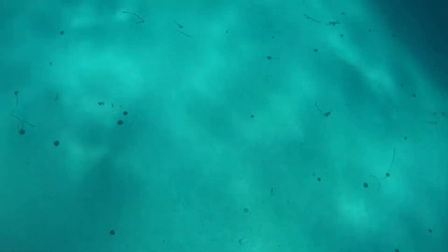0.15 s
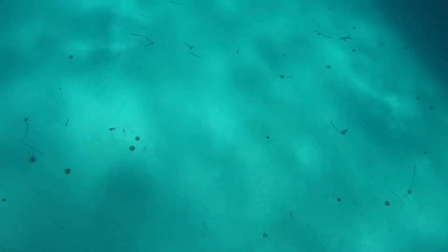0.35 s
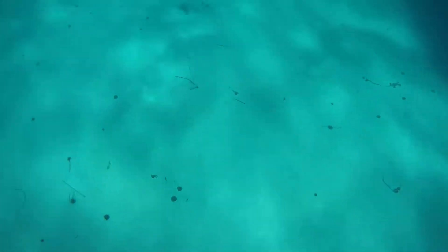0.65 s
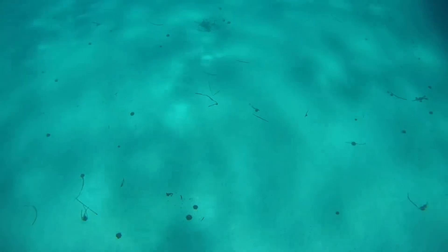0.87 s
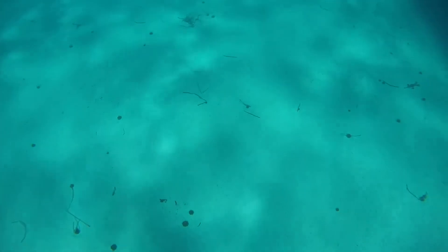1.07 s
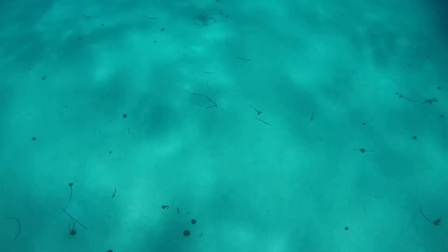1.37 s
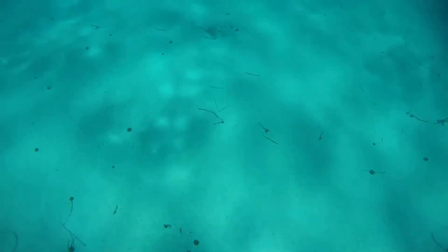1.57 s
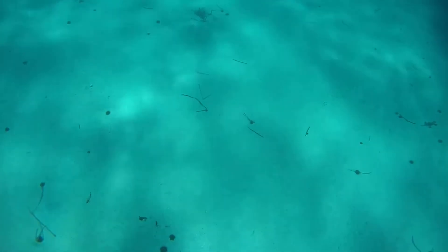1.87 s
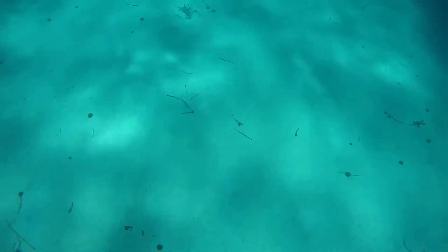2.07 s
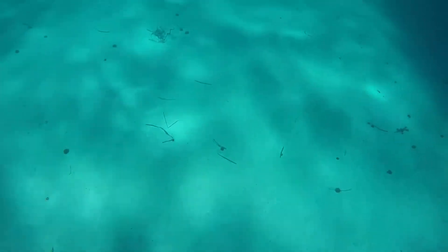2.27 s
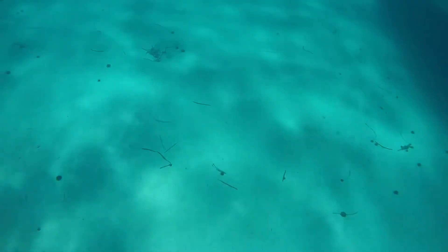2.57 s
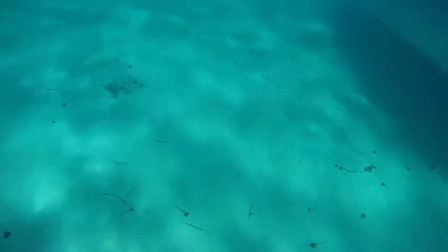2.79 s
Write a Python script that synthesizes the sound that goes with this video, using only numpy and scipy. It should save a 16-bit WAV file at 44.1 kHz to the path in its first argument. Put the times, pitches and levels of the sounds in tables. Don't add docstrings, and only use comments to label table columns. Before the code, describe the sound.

Water gurgling and glugging underwater around a submerged camera case, with dull bumps and low rumble

```python
import sys
import numpy as np
from scipy import signal
from scipy.fft import rfft, irfft
from scipy.io import wavfile
from scipy.ndimage import uniform_filter1d

SR = 44100
rng = np.random.default_rng(int(sys.argv[2]) if len(sys.argv) > 2 else 0)


def to_linear_factor(level_db):
    exponent = np.asarray(level_db, float) / 20
    return 10 ** exponent


def transcribe(signal):
    frames = np.atleast_2d(signal).T
    limited = np.clip(frames, -1, 1)
    pcm = np.round(limited * 32767).astype(np.int16)
    wavfile.write(sys.argv[1], SR, pcm)


N = 129213

# frequency in Hz, width in Hz, level in dB.
HOUSING = [(135, 57, -10.5), (304, 49, -7.5), (442, 82, -3), (537, 76, -3.5), (786, 96, -6),
           (1333, 132, -10), (1620, 340, -16), (1950, 260, -16)]
# frequency in Hz, width in Hz, level in dB.
CIRCUIT = [(8540, 450, -6.5), (9760, 640, -5.5), (12160, 780, -4), (14600, 580, -8)]
DIP_HZ, DIP_WIDTH_HZ = 1125, 290
FRAMES_PER_S, FIRST_TICK_S = 59.94, .0154


def rms_one(x):
    return x / np.sqrt(np.mean(x ** 2) + 1e-20)


def drift(rate):
    hop = 40
    r = np.exp(-2 * hop * np.pi * rate / SR)
    noise = rng.standard_normal(N // hop + 2002)
    slow = signal.lfilter([1], [1, -2 * r, r * r], noise)[2000:]
    return np.interp(np.arange(N) / hop, np.arange(len(slow)), rms_one(slow))


def lowpass(x, order, hz):
    return signal.sosfilt(signal.butter(order, hz, fs=SR, output="sos"), x)


def resonances(x, peaks):
    out = 0
    for k, (hz, width, db) in enumerate(peaks):
        r = np.exp(-np.pi * abs(width) / SR)
        poles = [2, -4 * r * np.cos(2 * np.pi * hz / SR), 2 * r * r]
        out = out + (-1) ** k * to_linear_factor(db) * signal.lfilter([1 - r * r, 0, r * r - 1], poles, x)
    return out


def hiss():
    b, a = signal.butter(1, 1460, "high", fs=SR)
    return to_linear_factor(-58.5) * signal.lfilter(b, a, rng.standard_normal(N))


def frame_ticks():
    clicks = np.full(N + 99, 1e-18)
    at = (np.arange(FIRST_TICK_S, N / SR, 1 / FRAMES_PER_S) * SR).astype(int)
    clicks[at] = to_linear_factor(2 * rng.standard_normal(len(at)))
    ticks = resonances(clicks[:N], CIRCUIT)
    peaks = np.abs(ticks[at[:-1, None] + np.arange(30)]).max(axis=1)
    return to_linear_factor(-48.5) * ticks / np.median(peaks)


def frame_whine():
    t = np.arange(N) / SR
    phase = (t - FIRST_TICK_S) * FRAMES_PER_S % 1
    gate = (phase > .5) + 0.082
    return to_linear_factor(-70) * uniform_filter1d(gate, size=40) * np.sin(2 * np.pi * 7852.2 * t)


def memory_writes():
    starts = [.33, .385, .51, .55, .62, .67, .72, .935, 1.1, 1.33, 1.44, 1.612, 1.79, 1.94, 2.12, 2.29,
              2.46, 2.64, 2.83]
    write_s = .052
    t = np.arange(N) / SR
    on = sum((t > s) & (t < s + write_s) for s in starts) * 1.
    busy = uniform_filter1d(on, size=400)
    return to_linear_factor(-64 + drift(30)) * busy * rms_one(resonances(rng.standard_normal(N), CIRCUIT))


def whistles():
    # frequency in Hz, level in dB rms.
    tones = [(9722, -66.5), (9862, -77), (11343, -68), (11483, -81)]
    end_s, blur_hz = 0.286, 80
    t, out = np.arange(N) / SR, 0
    for hz, db in tones:
        turns = np.cumsum(hz + blur_hz * drift(60)) / SR
        out = out + to_linear_factor(db + 4) * np.sin(2 * np.pi * turns)
    return out * np.clip((end_s - t) / .03, 0, 1)


def banded_noise(points, patchy_db):
    out, together = 0, drift(4)
    edges = 18 * 2 ** np.arange(0, 10, .5)
    white, table = rng.standard_normal((2, N + SR)), np.array(points)
    for k, (low, high) in enumerate(zip(edges, edges[1:])):
        sos = signal.butter(2, [low, high], "band", fs=SR, output="sos")
        band = signal.sosfilt(sos, white[k % 2])[SR:]
        hz = np.sqrt(low * high)
        level = np.interp(np.log(hz), np.log(table[:, 0]), table[:, 1])
        off = 30 * max(np.log2(table[0, 0] / hz), np.log2(hz / table[-1, 0]), 0)
        out = out + band * to_linear_factor(level - off + patchy_db * (0.21 * together + drift(22)))
    return rms_one(out)


def gurgle(vigour_db):
    per_s, spread_db, cycles = 250, 3.5, 13
    sizes = to_linear_factor(spread_db * np.minimum(rng.exponential(1, N), 3)) * rng.choice([-1, 1], N)
    born = rng.random(N) < per_s * to_linear_factor(vigour_db + 3 * drift(6)) / SR
    dealt, out = rng.integers(0, 24, N), 0
    for k, hz in enumerate(np.geomspace(110, 2300, 24)):
        r, w = to_linear_factor(-60 * hz / cycles / SR), 2 * np.pi * hz / SR
        impulses = sizes * born * (dealt == k) + 1e-18
        ring = signal.lfilter([0, np.sin(w)], [1, -2 * r * np.cos(w), r * r], impulses)
        out = out + np.sqrt(hz) * ring
    return out


def water():
    # time in seconds, rumble in dB, fizz in dB.
    flow = [(0, -30.5, -49), (.2, -34.5, -46), (.32, -35, -52), (.52, -39.5, -48), (.66, -39, -45),
            (.765, -37, -41), (.79, -36, -51), (.88, -35.5, -48), (1.1, -38, -47.5), (1.33, -40, -51),
            (1.6, -36, -54.5), (1.821, -42, -48.5), (1.86, -42.5, -56), (1.99, -41.5, -50),
            (2.1, -43.5, -54.5), (2.55, -38, -55), (2.93, -42, -56.5)]
    # frequency in Hz, level in dB per Hz.
    rumble_colour = [(20, -2), (60, 4.5), (250, 0), (500, -1.5), (850, -19), (1100, -29.5), (2500, -27.5),
                     (5000, -35.5)]
    rumble_db, rumble_follows = -3, 0.32
    s, db, fizz_db = np.transpose(flow)
    level, fizz = (np.interp(np.arange(N) / SR, s, c) for c in (db, fizz_db))
    swing = level - level.mean()
    rumble = banded_noise(rumble_colour, patchy_db=1.0)
    rumble = to_linear_factor(level.mean() + rumble_db + rumble_follows * swing) * rumble
    slosh = rng.standard_normal(N) * to_linear_factor(2 * drift(20))
    far = gurgle(swing)

    def through_housing(part):
        near_sound = to_linear_factor(-3.5) * rms_one(resonances(slosh, part))
        return near_sound + to_linear_factor(-9) * rms_one(resonances(far, part))

    low = lowpass(through_housing(HOUSING[:5]), 3, 950)
    high_pass = signal.butter(3, 1150, "high", fs=SR, output="sos")
    high = signal.sosfilt(high_pass, through_housing(HOUSING[5:]))
    return rumble + to_linear_factor(level) * low + to_linear_factor(fizz - 1) * high


def grit():
    # start in seconds, peak in dB, time to decay by 60 dB in seconds.
    puffs = [
        (0.1, -41, 0.031),
        (0.13, -46, 0.046),
        (.14, -65, 0.21),
        (.1965, -48, .02),
        (0.854, -55, 0.047),
        (0.875, -52, 0.055),
        (2.233, -50, .015),
        (2.811, -50, 0.023),
        (1.962, -46.5, 0.0076),
        (1.996, -50, 0.037),
    ]
    t, out = np.arange(N) / SR, 0
    for s, db, t60 in puffs:
        out = out + (t > s) * to_linear_factor(db - 60 * np.maximum(t - s, 0) / t60)
    grains = rng.standard_normal(N) * to_linear_factor(2.2 * drift(120))
    return out * rms_one(resonances(grains, [(2240, 1000, 0), (3600, 600, -4), (7000, 2500, -12)]))


def slaps():
    # time in seconds, peak in dB.
    hits = [(0.035, -30.5), (0.065, -42.5), (0.092, -38), (0.1624, -28), (.4219, -39.5), (.6444, -35),
            (0.729, -29), (.75, -33), (0.79, -33), (0.854, -38), (0.919, -35), (1.1308, -28), (1.351, -35),
            (1.526, -56), (1.601, -38), (1.7067, -31), (1.9595, -30.5), (1.987, -27), (2.183, -40),
            (2.2343, -42), (2.304, -31), (2.366, -32), (2.415, -52), (2.467, -43), (2.81, -35.5)]
    soft_hz, bright_db, widen = 2300, -4.5, 8.2
    s, db = np.transpose(hits)
    chance, out = rng.standard_normal((len(s), len(HOUSING))), 0
    for k, (hz, width, peak_db) in enumerate(HOUSING):
        clicks = np.full(N, 1e-18)
        strength_db = db + 1.8 * chance[:, k] + bright_db * (hz > DIP_HZ)
        clicks[(s * SR).astype(int)] = to_linear_factor(strength_db) * SR / (7 * width)
        ring = resonances(clicks, [(hz, width, peak_db)])
        out = out + (-1) ** k * resonances(ring, [(hz, widen * width, 0)])
    return lowpass(out, 4, soft_hz)


def surges():
    # middle in seconds, peak in dB, pitch in Hz, half length in seconds.
    bumps = [(.365, -24.5, 264, 0.0027), (.405, -23.5, 308, 0.0047), (.435, -17, 335, 0.0018),
             (.467, -21.5, 237, 0.004), (.474, -23.5, 139, 0.0081), (.575, -30, 280, 0.0088),
             (.805, -35, 123.4, 0.021), (.892, -22.5, 135, 0.0044), (.892, -20.5, 254, 0.00089),
             (.925, -31, 310, 0.012), (.955, -31, 154, 0.012), (.99, -24.5, 224, 0.009),
             (1.01, -27, 137, 0.0021), (1.722, -31.5, 275, 0.0095), (1.732, -31, 138, 0.012),
             (2.0, -31, 205, 0.0015), (2.015, -31.5, 166, 0.0043), (2.028, -25, 135, 0.0062),
             (1.712, -33.5, 196, 0.004), (2.285, -32, 188, 0.0041), (2.612, -31, 237, 0.0044),
             (2.695, -32, 173, 0.0052), (2.82, -30, 180, .008), (2.006, -31, 220, .005),
             (2.83, -35.5, 62.7, 0.018), (2.878, -33.5, 81, 0.02), (.975, -34.5, 84, 0.018),
             (2.887, -21, 330, 0.0016)]
    # middle in seconds, peak in dB, pitch in Hz, half length in seconds.
    bloops = [(.038, -25, 520, 0.0052), (0.206, -18.5, 458, 0.0031), (0.664, -26.5, 822, 0.0064),
              (.975, -18, 795, .004), (1.168, -17.5, 530, 0.0029), (1.202, -27, 510, 0.0041),
              (1.2566, -9, 496, 0.0017), (1.9985, -23, 514, 0.0017), (2.292, -24.5, 400, 0.003),
              (2.609, -31.5, 460, 0.0041), (2.629, -24.5, 420, 0.0022)]
    churn_stretch, churn_below_hz = 3.2, 350
    t, out = np.arange(N) / SR, 0
    lumps = rng.standard_normal(N) * to_linear_factor(2.5 * drift(60))
    sos = signal.butter(4, [90, 450], "band", fs=SR, output="sos")
    churn = to_linear_factor(-12.5) * rms_one(signal.sosfilt(sos, lumps))
    for s, db, hz, half in [*bumps, *bloops]:
        tone = np.exp(-((t - s) / half) ** 2 / 2) * np.sin(2 * np.pi * hz * (s - t))
        around = np.exp(-((t - s) / half / churn_stretch) ** 2 / 2) * churn * (hz < churn_below_hz)
        out = out + to_linear_factor(db) * (tone + around)
    return out


def pockets(rows, rise):
    attack_cycles, wobble_db = 1.37, 2
    out, t = np.zeros(N + SR), np.arange(SR // 2) / SR
    for s, db, hz, t60 in rows:
        cycles, t60 = hz * t, np.clip(t60, .01, .6)
        envelope = to_linear_factor(-60 * t / t60) * (1 - np.exp(-2 * cycles / attack_cycles)) ** 2
        ring = envelope * np.sin(2 * np.pi * (cycles + rise * cycles * t / t60))
        i = int((s - 1 / hz) * SR)
        out[i:i + len(t)] += to_linear_factor(db + 3.5) * ring
    return out[:N] * to_linear_factor(wobble_db * drift(37))


def plinks():
    # time in seconds, peak in dB, pitch in Hz, time to decay by 60 dB in seconds.
    small = [(0.0647, -33.5, 1770, 0.024), (0.1277, -39, 1800, 0.033), (0.1925, -27, 1297, 0.025),
             (0.2369, -35.5, 1910, 0.019), (0.8788, -37.5, 1350, 0.05), (1.2482, -29, 1345, 0.024),
             (1.4431, -40, 1980, 0.041), (1.604, -28.5, 1310, 0.027), (1.9612, -34, 1610, 0.02),
             (2.135, -41, 1560, 0.076), (2.3052, -32, 1425, 0.054), (2.368, -41.5, 1450, 0.041),
             (2.4678, -41, 1480, 0.03), (2.5384, -42.5, 1410, 0.037), (2.5634, -28, 1207, 0.025),
             (.1465, -45.5, 2570, .03), (.177, -52, 3770, .02), (.381, -42, 1460, 0.032),
             (.5786, -45, 1820, 0.036), (.6055, -41, 1410, 0.067), (.8205, -47, 1900, 0.018),
             (.835, -44, 1900, 0.045), (.878, -39, 1920, 0.032), (1.05, -37, 1285, 0.054),
             (1.264, -41, 1410, 0.037), (1.3523, -40, 1385, 0.035), (1.488, -46, 1455, .05),
             (1.7444, -40.5, 1440, 0.033), (1.8033, -51, 1340, .05), (1.8991, -41, 1900, 0.017),
             (2.5062, -49, 1390, 0.083), (2.592, -43, 1350, 0.035), (2.7511, -42, 1330, 0.042),
             (2.835, -48, 2400, 0.033)]
    return pockets(small, rise=0.049)


def glugs():
    # time in seconds, peak in dB, pitch in Hz, time to decay by 60 dB in seconds.
    middling = [(0.035, -23, 868, 0.061), (0.194, -26.5, 840, 0.13), (0.556, -25, 747, 0.059),
                (0.587, -30.5, 767, 0.13), (.648, -24, 793.5, 0.093), (0.855, -28, 778, 0.094),
                (0.877, -26.5, 756, 0.036), (0.971, -16, 802, 0.1), (1.164, -30, 743, 0.14),
                (1.412, -38, 876, 0.14), (1.444, -30, 786, 0.09), (1.986, -29, 764, 0.057),
                (2.186, -42.5, 795, 0.056), (2.225, -41, 764, 0.089), (2.362, -33.5, 864, 0.056),
                (2.54, -36.5, 822, .08), (2.812, -30.5, 794, 0.069), (2.85, -37.5, 895, 0.11),
                (2.839, -33.5, 862, 0.075)]
    return pockets(middling, rise=0.0015)


def gulps():
    # time in seconds, peak in dB, pitch in Hz, time to decay by 60 dB in seconds.
    large = [(.132, -35, 532, 0.24), (.338, -24, 474, 0.17), (.564, -25.5, 469.4, 0.28),
             (.582, -19.5, 476.6, 0.067), (.693, -30.5, 542, 0.1), (1.06, -36, 432, 0.36),
             (1.262, -17.5, 533.5, 0.19), (1.576, -26, 412.7, 0.25), (1.746, -23, 537, 0.2),
             (1.961, -25, 553, 0.096), (1.986, -30, 517, 0.056), (.406, -27, 472, 0.048),
             (2.47, -38.5, 553.5, 0.69), (2.563, -32, 509.5, 0.13), (2.755, -32, 622, .13),
             (1.163, -22.5, 526, 0.078), (2.265, -28, 406, 0.12), (2.814, -12, 440, 0.025),
             (.724, -34, 528, 0.054), (2.826, -31, 414.2, 0.51), (2.89, -31.5, 403, 0.26)]
    return pockets(large, rise=-0.00067)


def scene():
    electronics = hiss() + frame_ticks() + frame_whine() + memory_writes() + whistles()
    bubbles = surges() + plinks() + glugs() + gulps()
    bubbles = bubbles - resonances(bubbles, [(DIP_HZ, DIP_WIDTH_HZ, -0.6)])
    return (electronics + water() + grit() + slaps() + bubbles)[None]


def low_pass(x):
    return signal.sosfilt(signal.butter(12, 16160, fs=SR, output="sos"), x)


def record(dry):
    mirrored = np.concatenate([dry, dry[:, ::-1]], axis=1)
    spectrum = rfft(mirrored)
    hz = np.arange(spectrum.shape[1]) * SR / N / 2
    mix = irfft(spectrum * (hz < 15290), 2 * N)[:, :N]
    return low_pass(mix)


dry = scene()
out = record(dry)
transcribe(out)
```